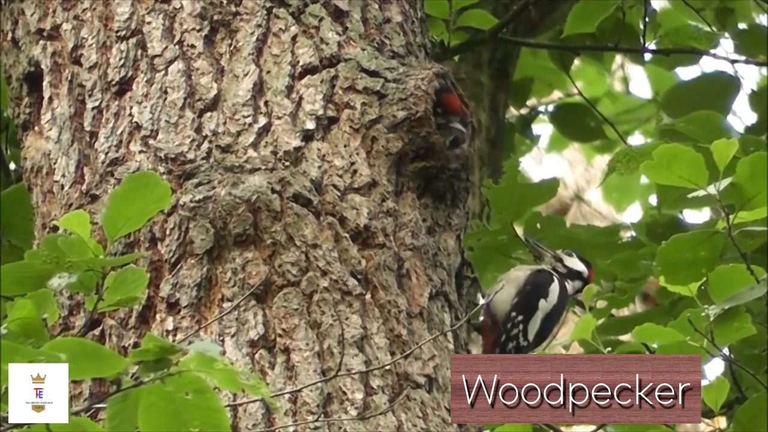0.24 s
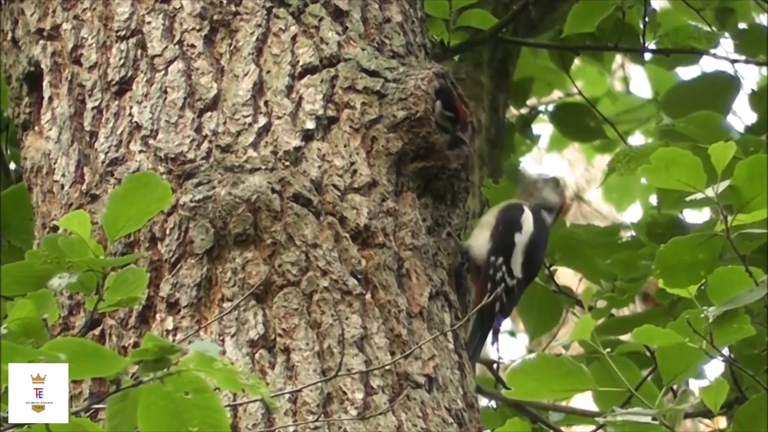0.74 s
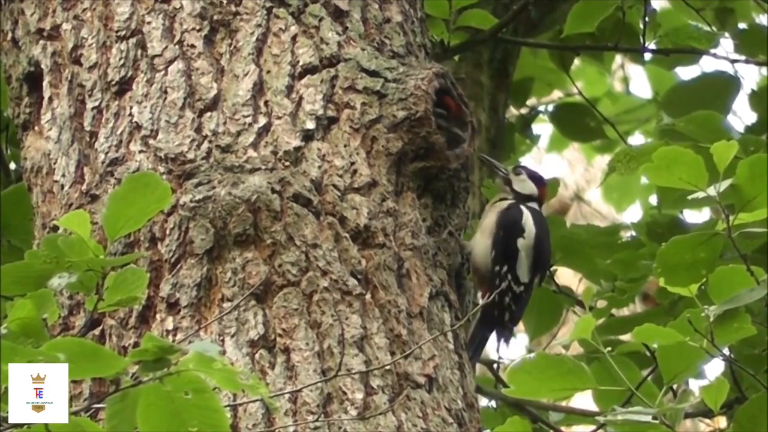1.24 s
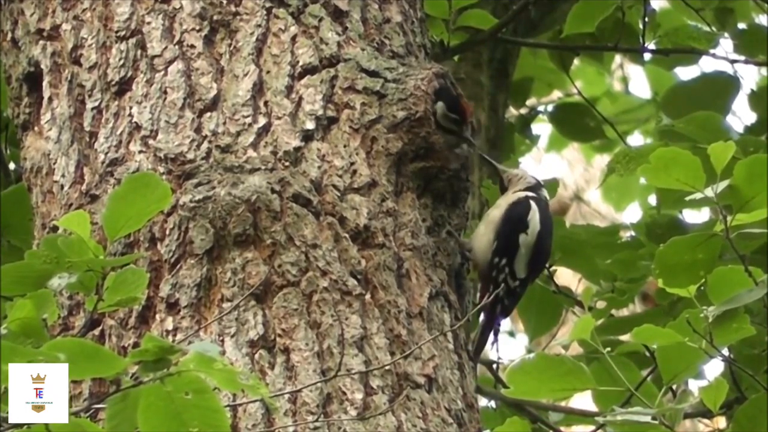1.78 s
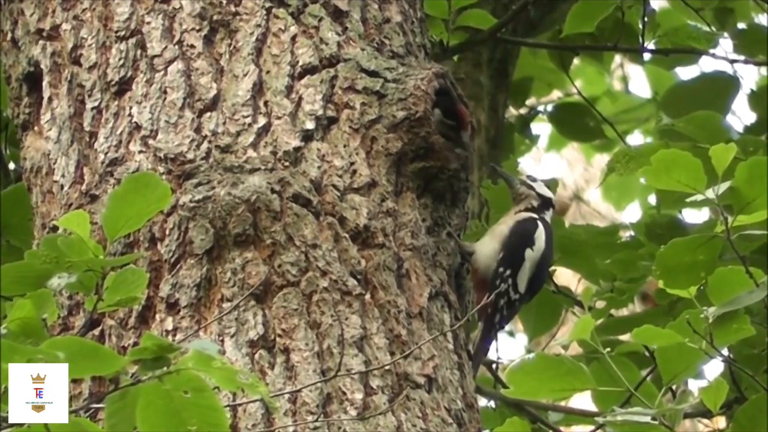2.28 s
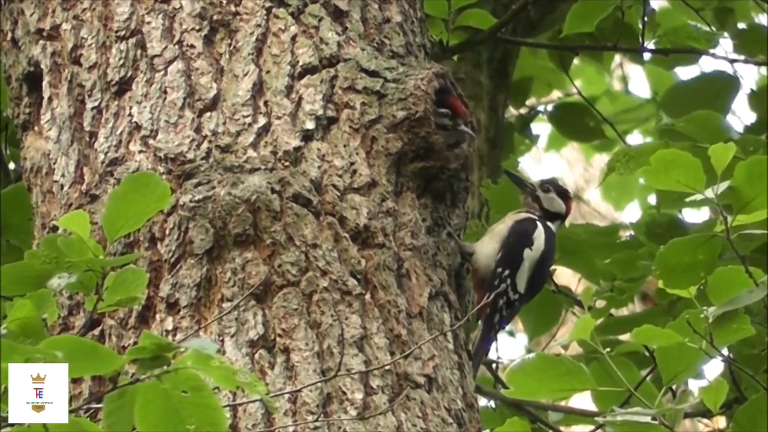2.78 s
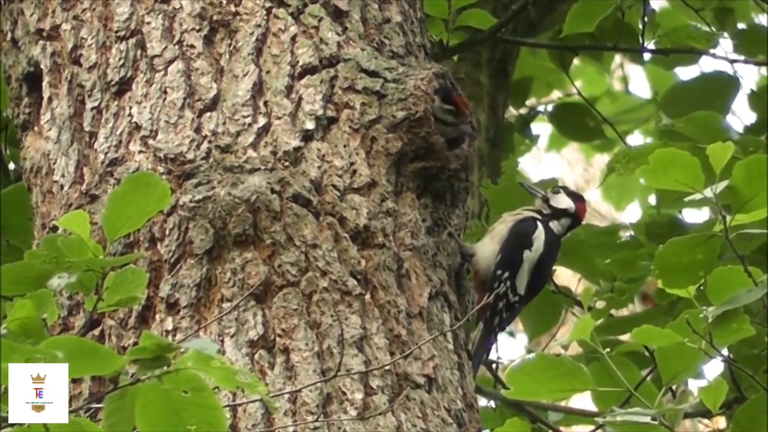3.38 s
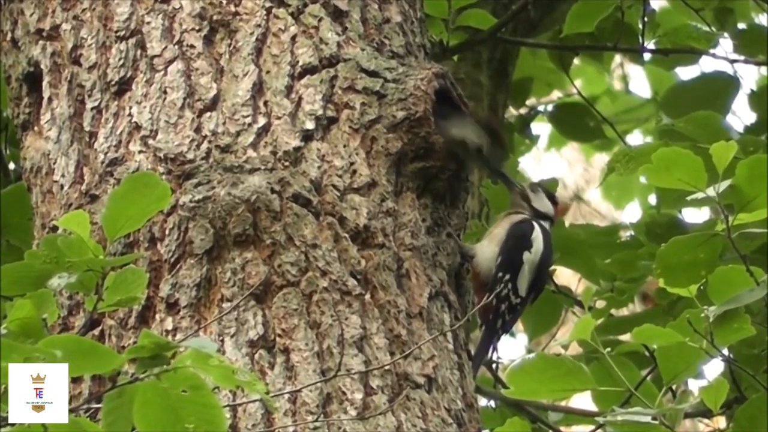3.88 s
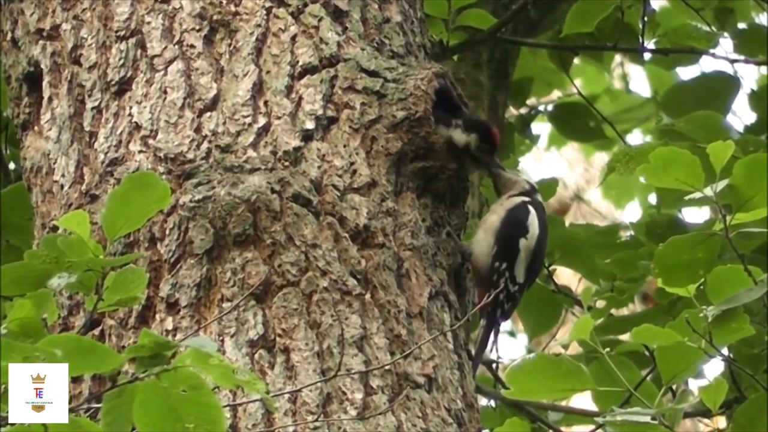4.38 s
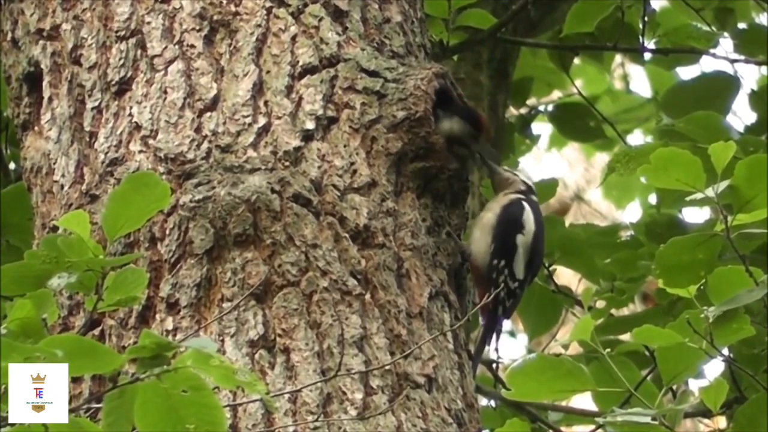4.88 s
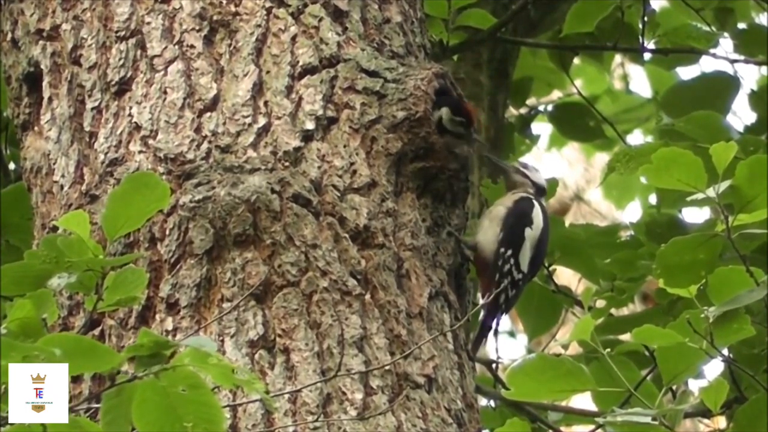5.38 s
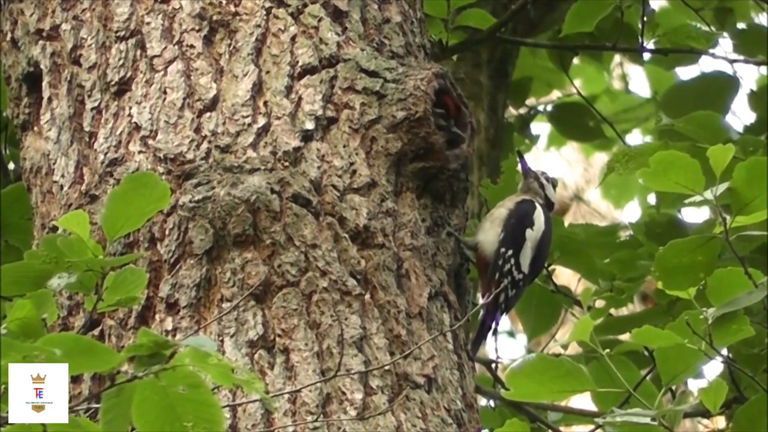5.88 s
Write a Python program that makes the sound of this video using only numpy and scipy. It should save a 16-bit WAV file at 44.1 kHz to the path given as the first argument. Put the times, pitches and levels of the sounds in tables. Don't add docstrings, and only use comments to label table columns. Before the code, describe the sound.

Woodpecker chicks in a trunk hole beg with short, sharp, arched yelps about four a second, while a songbird whistles faintly farther off.

```python
import sys
import numpy as np
from scipy import signal
from scipy.io import wavfile
from scipy.ndimage import uniform_filter1d, map_coordinates

SR = 44100
rng = np.random.default_rng(int(sys.argv[2]) if len(sys.argv) > 2 else 0)


def store_wav(level_fs):
    pcm = np.round(np.clip(np.atleast_2d(level_fs), -1, 1) * 32767)
    wavfile.write(sys.argv[1], SR, pcm.T.astype(np.int16))


def volts_from_decibels(level):
    exponent = np.asarray(level, float) / 20
    return 10 ** exponent


N = 270774


def unit(x):
    return x / np.sqrt(np.mean(x ** 2) + 1e-20)


def along(points, hz):
    f, v = np.transpose(points)
    return np.interp(np.log(hz + 1), np.log(f + 1), v)


def wobble(n, rate):
    knots = rng.standard_normal(int(n * rate / SR) + 4)
    return map_coordinates(knots, [np.arange(n) * rate / SR])


def clock(length):
    return np.arange(int(length * SR)) / SR


def sampled(rows):
    s, *cols = np.transpose(rows)
    t = clock(s[-1] - s[0])
    return [t] + [np.interp(s[0] + t, s, c) for c in cols]


def edges(t, rise, fall):
    return np.clip(t / rise, 0, 1) * np.clip((t[-1] - t) / fall, 0, 1)


def syrinx(pitch_hz, gains, jitter, flutter_db):
    n = len(pitch_hz)
    phase = 2 * np.pi * np.cumsum(pitch_hz * (1 + jitter * wobble(n, 918))) / SR
    voice = 0
    for k, gain in enumerate(gains, 1):
        audible = k * pitch_hz < SR / 2
        flutter = volts_from_decibels(flutter_db * wobble(n, 222))
        voice = voice + np.sqrt(2) * gain * audible * flutter * np.sin(k * phase)
    return voice


def stack(t, hz, low_db, high_db, jitter):
    # (frequency [Hz], level [dB])
    throat = [(2000, 22.5), (4500, 3.5), (7500, 4), (10000, -5), (13000, -10.5), (16000, -39)]
    gains = [volts_from_decibels(low_db)] + [volts_from_decibels(high_db + along(throat, k * hz)) for k in range(2, 9)]
    return edges(t, 0.00022, 0.0091) * syrinx(hz, gains, jitter=jitter, flutter_db=4.0)


def add(out, s, note, near_db, wet_db, wide_db=0):
    # (frequency [Hz], time to fall 60 dB [s])
    wood_edge = [(1000, 0.1), (2500, 0.94), (5000, 1.375), (8000, 0.64), (14000, 0.57)]
    # (frequency [Hz], level [dB])
    bark = [(1200, -6), (2500, 2), (3500, 6), (5000, 1), (7000, 0.5), (10000, -4), (15000, -2)]
    # (frequency [Hz], level [dB])
    width = [(1500, -37), (4000, -31), (8000, -30), (12000, -16)]
    hz, t = np.fft.rfftfreq(256, 1 / SR), np.arange(250) * 128 / SR
    z = rng.standard_normal((2, len(hz), 2 * len(t))).view(complex) / 13
    far = volts_from_decibels(-60 * t / along(wood_edge, hz)[:, None]) * np.clip(t / 0.0018, 0, 1)
    near = volts_from_decibels(near_db - wet_db + 7.5 - 60 * t / 0.18)
    trunks = volts_from_decibels(5.2 * uniform_filter1d(rng.standard_normal(len(t)), size=5))
    colour = volts_from_decibels(along(bark, hz) + [0 * hz, along(width, hz) + wide_db])[..., None]
    echo = signal.istft(z * colour * trunks * np.hypot(far, near), SR, nperseg=256)[1]
    echo *= volts_from_decibels(wet_db - 32.5)
    echo[:, 0] = 1, 0
    mid, side = signal.fftconvolve(note[None], echo, axes=1)
    at = round(s * SR)
    heard = np.array([mid + side, mid - side])[:, max(-at, 0):N - at]
    out[:, max(at, 0):at + len(mid)] += heard


def rush(spectrum, alike, patchy_db):
    hz, _, z = signal.stft(rng.standard_normal((2, N + SR)), SR, nperseg=4096)
    field = rng.standard_normal(z.shape[1:])
    field = uniform_filter1d(uniform_filter1d(field, 30, 0), 3, 1)
    turn = np.arccos(np.clip(along(alike, hz), -1, 1)) / 2
    shape = volts_from_decibels(along(spectrum, hz)) * [np.cos(turn), np.sin(turn)]
    z = z * shape[..., None] * volts_from_decibels(patchy_db * unit(field))
    mid, side = signal.istft(z, SR, nperseg=4096)[1][:, :N]
    return unit(np.array([mid + side, mid - side]))


def traffic_hum():
    # (frequency [Hz], density [dB per Hz])
    hum_spectrum = [(12, -46), (20, -22), (86, -0.5), (155, -7), (189, 0.5), (252, -1), (318, -3.5),
                    (352, -1.5), (430, -5.5), (915, -8), (1100, -7.5), (1430, -73), (2420, -120)]
    # (frequency [Hz], correlation [1])
    likeness = [(30, .9), (90, 0.9), (180, 0.88), (350, 0.34), (700, 0.097), (1100, 0.082)]
    return volts_from_decibels(-62.5) * rush(hum_spectrum, likeness, patchy_db=1.67)


def leaf_air():
    # (frequency [Hz], density [dB per Hz])
    air_spectrum = [(900, -24), (1100, -1.5), (2000, 2.5), (4000, 3), (7000, -14.5), (10000, -12.5),
                    (16000, -31)]
    likeness = [(1000, 0.58), (3000, 1.0), (9000, 0.99), (13000, 0.89)]  # (frequency [Hz], correlation [1])
    return volts_from_decibels(-56) * rush(air_spectrum, likeness, patchy_db=5.0)


def far_peeps(out):
    # (time [s], length [s], first pitch [Hz], last pitch [Hz], level [dB])
    peep_notes = [(-.09, 0.047, 6460, 5180, -42), (0.295, 0.0094, 5920, 5500, -40),
                  (0.444, 0.022, 2200, 2160, -50), (0.473, 0.015, 2360, 2260, -45.5),
                  (0.651, 0.033, 1750, 1670, -52), (3.705, .012, 3210, 3100, -62),
                  (5.555, 0.016, 3970, 3770, -51), (5.596, 0.036, 2990, 3054, -60),
                  (5.623, 0.05, 5700, 5600, -60), (5.632, 0.043, 2970, 3640, -61),
                  (5.859, 0.013, 4800, 4100, -49), (5.873, 0.017, 3930, 3860, -52),
                  (6.038, 0.023, 3900, 3820, -53.5), (6.127, .015, 5900, 5900, -56),
                  (.425, 0.03, 8400, 9200, -71), (2.92, .025, 8630, 9300, -78),
                  (3.735, 0.022, 8500, 9300, -72)]
    for s, length, first_hz, last_hz, db in peep_notes:
        t, hz = sampled([(0, first_hz), (length, last_hz)])
        peep = edges(t, 0.0022, 0.0076) * syrinx(hz, [volts_from_decibels(db)], jitter=0.0052, flutter_db=1.5)
        add(out, s, peep, near_db=-4.5, wet_db=-5.5)


def songbird(out):
    # (time [s], length [s], first pitch [Hz], last pitch [Hz], level [dB])
    slurs = [(0.1, 0.061, 3290, 3690, -42.5), (0.222, 0.0262, 2796, 3065, -43),
             (.78, 0.073, 2770, 3200, -41.5), (.855, 0.047, 3220, 2750, -43.5),
             (.9, 0.15, 3013, 3576, -44.5), (1.119, 0.048, 5410, 4080, -40),
             (1.263, 0.059, 3780, 3344, -44.5), (1.477, 0.057, 4214, 2750, -40.5),
             (1.553, 0.035, 2756, 3106, -40), (1.748, 0.077, 4190, 3643, -38),
             (1.898, 0.098, 2815, 3327, -40.5), (2.066, 0.034, 3760, 3460, -41.5),
             (2.257, 0.041, 2777, 2825, -41.5), (2.305, 0.067, 2815, 3327, -44)]
    for s, length, first_hz, last_hz, db in slurs:
        t = clock(length)
        if first_hz > last_hz:
            swell_db, remaining = 5, np.cos(np.pi / 2 * np.clip(t / 0.037, 0, 1)) ** 2
        else:
            swell_db, remaining = 8, (1 - t / length) ** 1.7
        off_hz = (first_hz - last_hz) * remaining
        level_db = db - swell_db * np.tanh(abs(off_hz) / 500)
        gains = [volts_from_decibels(level_db), volts_from_decibels(level_db - 38)]
        whistle = edges(t, .004, .006) * syrinx(last_hz + off_hz, gains, jitter=.0015, flutter_db=1.2)
        add(out, s, volts_from_decibels(0.5) * whistle, near_db=-8, wet_db=-3.0, wide_db=9)


def second_chick(out):
    # (time [s], length [s], pitch [Hz], fundamental level [dB], overtone level [dB])
    pipe_notes = [
        (4.232, .019, 3494, -42, -47.5),
        (4.252, 0.013, 3470, -55, -56),
    ]
    scoop, scoop_s = 0.03, 0.0052
    for s, length, pitch_hz, low_db, high_db in pipe_notes:
        t = clock(length)
        hz = pitch_hz * (1 - scoop * np.clip(1 - t / scoop_s, 0, 1))
        add(out, s, stack(t, hz, low_db, high_db, jitter=0.01), near_db=-9.0, wet_db=-15)


def gulps(out):
    # (time [s], level [dB])
    swallows = [(0.204, -48), (1.172, -55), (1.409, -56.5), (1.918, -55), (2.432, -52.5), (2.719, -51.5),
                (3.22, -56), (3.468, -49), (3.779, -54.5), (4.026, -59.5), (4.498, -51), (4.796, -57.5),
                (5.069, -50.5), (5.362, -54), (5.894, -47.5)]
    for s, db in swallows:
        # (time [s], pitch [Hz], fundamental level [dB], overtone level [dB])
        glide = [(0, 1850, db - 3, db - 8), (.005, 1580, db, db - 9),
                 (.012, 1480, db - 4, db - 14), (.022, 1680, db - 3, db - 15)]
        add(out, s, stack(*sampled(glide), jitter=.04), near_db=-8, wet_db=-11)


def squeaks(out):
    # (time [s], length [s], first pitch [Hz], top pitch [Hz], level [dB])
    swallowed = [
        (0.252, 0.046, 2400, 2496, -52.5),
        (1.652, 0.067, 1627, 2475, -48),
        (4.243, .068, 2336, 2604, -53),
    ]
    fall_s, drop = .034, .45
    shut_hz, shut_span_hz, muffle_db = 2090, 150, 33
    gape_at, gape_span = 0.07, 0.2
    for s, length, first_hz, top_hz, db in swallowed:
        t = clock(length)
        crest_s = length - fall_s
        before = np.clip(1 - t / crest_s, 0, 1)
        after = np.clip((t - crest_s) / fall_s, 0, 1)
        hz = top_hz - (top_hz - first_hz) * before ** 1.3 - drop * top_hz * after ** 1.9
        shut = np.clip((hz - shut_hz) / shut_span_hz, 0, 1) * np.clip(1 - (after - gape_at) / gape_span, 0, 1)
        low_db = db - 2 * (after ** 3 + before ** 6) - 0.5 * shut
        high_db = low_db - 2 - muffle_db * shut
        add(out, s, stack(t, hz, low_db, high_db, jitter=0.021), near_db=-7.5, wet_db=-6.0)


def yelps(out):
    # (time [s], length [s], top pitch [Hz], loudness [dB], gape: fourth partial over second [dB])
    begging = [(0.03, 0.046, 2422, -29.5, 0), (0.4898, .0491, 2556, -25, 1),
               (0.7377, 0.044, 2364, -28, -1.5), (0.968, 0.05, 2418, -27.5, -0.5),
               (1.1886, 0.053, 2515, -28.5, -2.5), (1.4243, 0.052, 2615, -27.5, -2.5),
               (1.9283, 0.06, 2488, -29, -1.9), (2.2047, 0.062, 2455, -33.5, -2.5),
               (2.4454, 0.065, 2534, -40, -20.5), (2.7355, 0.047, 2500, -32.5, -3.5),
               (3.235, 0.044, 2630, -28.5, -4.5), (3.4837, .0595, 2556, -29, -4.5),
               (3.7985, 0.048, 2475, -28, 1.3), (4.0426, .0661, 2460, -31.5, 3.5),
               (4.5148, 0.073, 2570, -30.5, -10.5), (4.8106, 0.071, 2381, -30.5, 2.5),
               (5.085, 0.06, 2406, -35.5, -11.5), (5.3774, 0.054, 2406, -32, 3),
               (5.671, 0.05, 2416, -32, -2), (5.912, 0.043, 2620, -25, -6)]
    # time [s], length [s], pitch [Hz], levels [dB]
    late_begging = [
        (3.033, .048, 2450, -39, -14),
    ]
    # (level over loudness [dB], lean [dB per dB of gape])
    overtones = [(-8, -0.63), (0.8, 0), (-6, 0.42), (-16.5, 0.1), (-26, .15)]
    chest_db = -40
    crest = .51
    late_gape, late_muffle_db = .4, 24
    for row in begging + late_begging:
        s, length, top_hz, loud_db, gape_db = row
        sag = .115 - .004 * gape_db
        levels = [chest_db] + [loud_db + db + lean * gape_db for db, lean in overtones]
        u = np.arange(int(1.32 * length * SR)) / (length * SR) - .12
        before = np.clip(1 - u / crest, 0, 1.02)
        after = np.clip((u - crest) / (1 - crest), 0, 1.02)
        rise = sag * before ** 1.7 + (.36 - sag) * before ** 8
        hz = top_hz * (1 - rise - .24 * after ** 2 - .24 * after ** 4)
        effort_db = -3 * before - 8 * before ** 5 - 5.5 * after ** 2
        shut = np.clip((u - .98) / 0.017, 0, 1) + np.clip(-u / .035, 0, 1)
        colour = [(k * top_hz, db) for k, db in enumerate(levels, 1)] + [(19000, -88)]
        gains = []
        for k in range(1, 9):
            throat_db = 0.6 * along(colour, k * hz) + 0.37 * along(colour, k * top_hz)
            gains.append(volts_from_decibels(throat_db - 5.5 - (10.6 * k + 2.5) * shut))
        if row in late_begging:
            muffle = volts_from_decibels(-late_muffle_db * np.clip((late_gape - u) / 0.15, 0, 1))
            gains[1:] = [muffle * gain for gain in gains[1:]]
        clear = syrinx(hz, gains, jitter=.0032, flutter_db=2.6)
        rasp = volts_from_decibels(-24 + 9 * (before + after) ** 3) * wobble(len(u), 4000)
        yelp = volts_from_decibels(effort_db) * edges(u - u[0], 0.039, 0.033) * clear * (1 + rasp)
        add(out, s + u[0] * length, yelp, near_db=-4.5, wet_db=-7)


def scene():
    birds = np.zeros((2, N))
    for add_birds in (far_peeps, songbird, second_chick, gulps, squeaks, yelps):
        add_birds(birds)
    return birds + traffic_hum() + leaf_air()


def low_pass(x):
    return signal.sosfilt(signal.butter(12, 15710, fs=SR, output="sos"), x)


def record(dry):
    return low_pass(dry)


dry = scene()
out = record(dry)
store_wav(out)
```